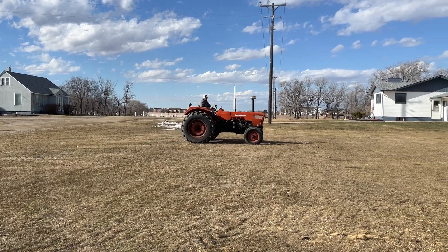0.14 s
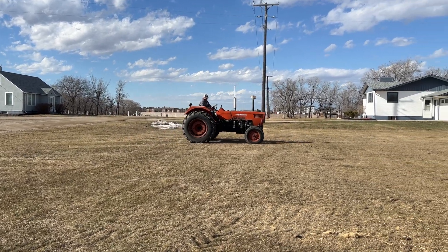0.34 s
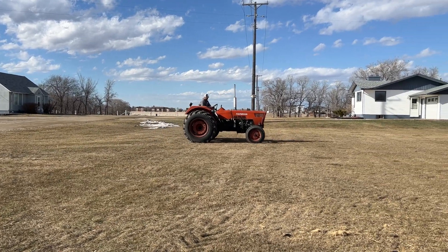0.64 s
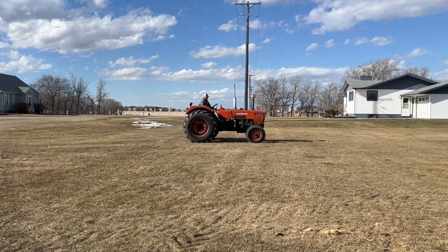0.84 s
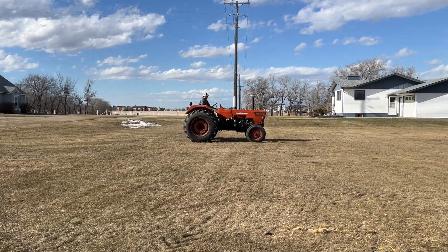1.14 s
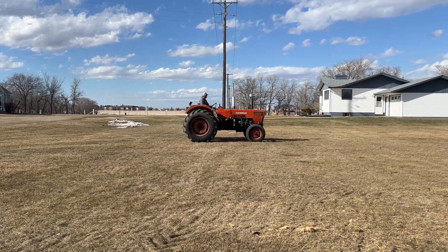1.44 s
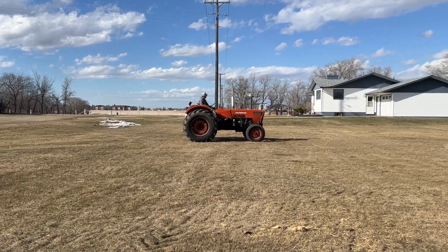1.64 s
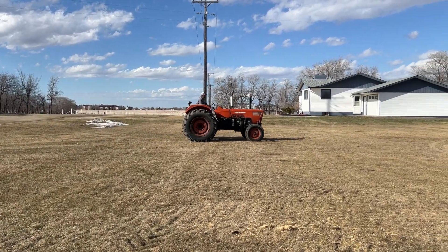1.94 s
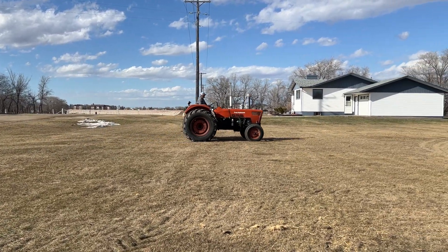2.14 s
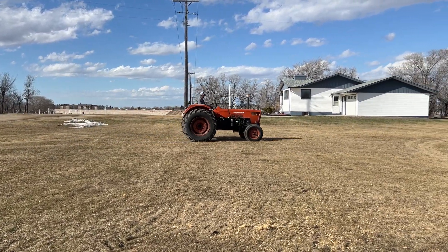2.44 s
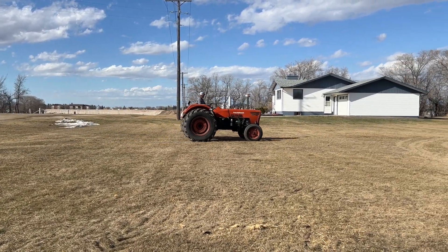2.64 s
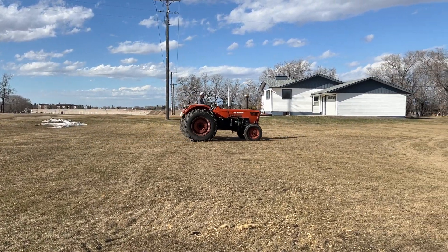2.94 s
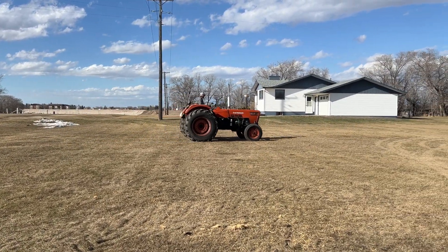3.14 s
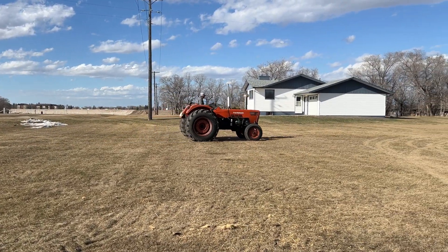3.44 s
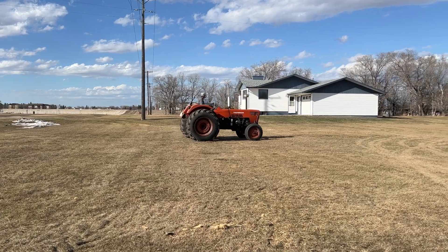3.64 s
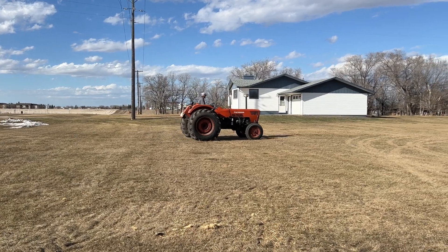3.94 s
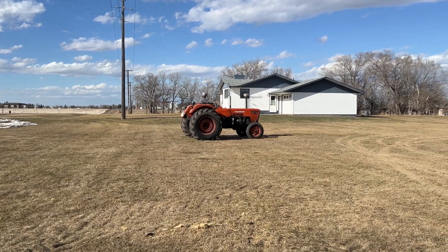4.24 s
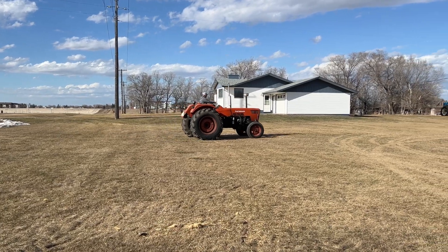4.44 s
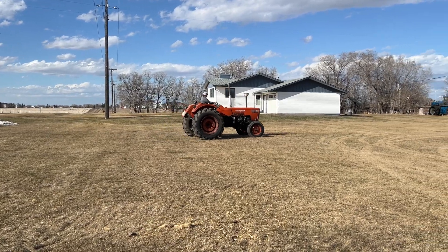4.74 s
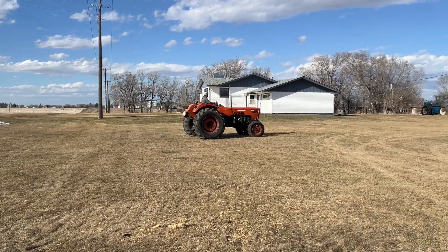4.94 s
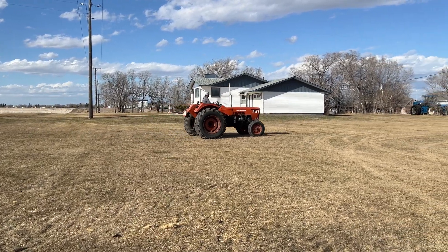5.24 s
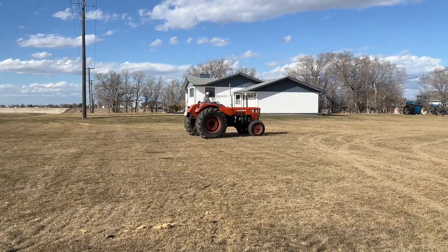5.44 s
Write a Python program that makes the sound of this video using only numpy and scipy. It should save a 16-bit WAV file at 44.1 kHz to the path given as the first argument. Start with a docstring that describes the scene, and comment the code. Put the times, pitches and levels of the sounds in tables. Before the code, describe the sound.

A diesel tractor engine drones and clatters steadily outdoors, with a rush of fan air, injector ticks and one insistent metallic knock.

```python
"""A four-cylinder air-cooled diesel tractor crawls across a farm yard at a governed speed.
From the start its exhaust drones as a sum of harmonics, beating slowly against a second, idling engine.
Shaped noise gives the fan's rush and, cylinder by cylinder, injector ticks, block knocks, rattle and puffs;
damped sines give the metal impacts and a loose piston's knock. Rush and puffs are strongest at 1.5 s,
the knock peaks at 2.4 s, and from 2.3 s on the injector ticks are progressively screened."""
import sys
import numpy as np
from scipy import signal
from scipy.fft import rfft, irfft
from scipy.io import wavfile

SR = 44100
rng = np.random.default_rng(int(sys.argv[2]) if len(sys.argv) > 2 else 0)


def dump_mix(stems):
    """Bounce the given channels to the path in sys.argv[1] as a 16-bit WAV at rate SR."""
    frames = np.atleast_2d(stems).T  # one column per channel
    limited = np.clip(frames, -1, 1)  # hard clip at full scale
    pcm = np.round(limited * 32767).astype(np.int16)
    wavfile.write(sys.argv[1], SR, pcm)


N = 246519
TIME = np.arange(N) / SR
FREQS = np.fft.rfftfreq(N, 1 / SR) + 1e-6  # the offset avoids division by zero

# One engine cycle is two crank turns; a place in the cycle runs from 0 to 1.
# Crank speed as the governor hunts about its setting: t/s, speed/(rev/min)
CRANK_SPEED = [(0.0, 1475.7), (0.62, 1493.3), (1.12, 1464.1), (1.78, 1492.4), (1.92, 1476.6),
               (2.64, 1474.6), (2.78, 1484.4), (3.77, 1476.1), (4.07, 1487), (4.71, 1468.3), (5.59, 1479.4)]
# Exhaust harmonics: order [multiples of the cycle rate], peak level/dB at start, middle and end
EXHAUST_ORDERS = [(4, -29.5, -31.3, -31.5), (6, -45, -48, -47), (7, -47, -50, -60), (8, -34, -34, -32.5),
                  (9, -38, -46, -49), (10, -40, -39, -43), (11, -38, -40.5, -43.5), (12, -32, -33, -39),
                  (14, -42, -48, -58), (15, -40, -39, -40), (16, -34.5, -35.5, -33.5), (17, -36, -34, -34),
                  (18, -36, -38, -40), (19, -31, -30.3, -31.5), (20, -48, -46, -44), (21, -29, -25.8, -28),
                  (22, -44, -49, -53), (23, -55, -51, -48), (25, -50, -54, -62), (26, -52, -49, -56),
                  (28, -58, -54, -47), (30, -57, -50, -60), (32, -48, -50, -49), (50, -54, -54, -55),
                  (60, -47, -49, -50)]
# Harmonics of the idling engine: order [multiples of its cycle rate], peak level/dB at start, middle, end
IDLER_ORDERS = [(6, -33.3, -33.8, -33.8), (7, -44, -45, -45), (9, -36, -36, -36), (12, -44, -44, -44),
                (15, -51, -53, -51), (17, -44, -47, -45), (18, -35, -35.5, -34), (21, -43, -43, -45),
                (22, -43, -45, -48), (24, -49, -49, -55), (56, -53, -53, -54)]
IDLER_RPM = 900
# Silencers: delay [cycles], dispersion [turns per squared order above the firing order]
TRACTOR_SILENCER = (.334, .1105)
IDLER_SILENCER = (.728, .0455)
# Pipe boom, slightly sharp so that it drifts against the idler: centre [order], half-width [orders], shift f/Hz
PIPE_BOOM = (11.5, 1.5, .085)

# Cylinders in firing order: place [cycles], relative level/dB of injector, combustion, valve rattle
CYLINDER_BLOWS = [(.178, 1, 0, -1.5), (.43, -3.5, -.5, 0), (.682, 0, .5, .5), (.935, -4, -1.5, -3)]
# Noise spectra of air rush, exhaust puffs, block, injectors, valve gear: f/Hz, relative level/dB per Hz
FAN_SPECTRUM = [(20, -32), (45, -30), (90, -9.5), (150, 6), (270, 1.5), (350, -5.5), (550, -7),
                (1000, -2.5), (1400, -5), (2200, -9.5), (3800, -20.5), (6500, -32.5), (8500, -29.5),
                (10500, -54), (15500, -46)]
GAS_SPECTRUM = [(150, -25), (290, 0), (420, -1), (530, -5), (800, -25), (2000, -60)]
BLOCK_SPECTRUM = [(200, -7), (300, 2), (450, -7), (590, -8), (740, 5.5), (930, -6), (1170, -5.5), (1370, 3),
                  (1650, -10.5), (2100, -10), (2900, -22), (4200, -25), (6500, -19.5), (12000, -80)]
INJECTOR_SPECTRUM = [(1500, -22), (3200, -9), (4700, 0.5), (5200, 7.5), (6000, 10.5), (6700, -21),
                     (7300, 5.5), (7800, 12.5), (8400, 8.5), (9300, 2.5), (10300, -14), (15500, 0.5)]
VALVE_SPECTRUM = [(1000, -25), (1900, 6), (2300, 2), (2510, 7), (2750, -0.5), (3250, -4.5), (3700, -6),
                  (4200, -5), (4750, -7), (6500, -25), (12000, -58)]

# Bonnet panels and fins that sing along: f/Hz, bandwidth f/Hz, level/dB at five evenly spaced moments
PANEL_MODES = [(740, 12, -51, -51, -55, -56, -53), (795, 12, -51, -52, -58, -57, -54),
               (1043, 18, -45.5, -45, -50, -50, -52), (1375, 80, -50, -43, -50, -43.5, -43),
               (2500, 90, -49.5, -53, -51, -55, -58), (3200, 300, -55, -58, -60, -55, -57),
               (4500, 400, -56, -60, -60, -64, -66)]
# Impacts of pistons, valves, gears: place [cycles], ring f/Hz, decay t/s, level/dB at four even moments
METAL_IMPACTS = [(0.03, 910.0, 0.0007, -47.0, -57.0, -57.0, -57.0),
                 (0.195, 1100.0, 0.0007, -49.0, -49.0, -51.0, -53.0),
                 (0.205, 3300.0, 0.003, -60.0, -63.0, -63.0, -61.0),
                 (0.21, 2050.0, 0.0012, -52.0, -56.0, -55.0, -54.0),
                 (0.235, 1210.0, 0.0007, -48.0, -50.0, -49.0, -47.0),
                 (0.245, 1050.0, 0.002, -47.0, -51.0, -57.0, -57.0),
                 (0.26, 1690.0, 0.0012, -60.0, -54.0, -58.0, -50.0),
                 (0.445, 3300.0, 0.003, -62.0, -60.0, -58.0, -68.0),
                 (0.455, 830.0, 0.0007, -59.0, -59.0, -49.0, -59.0),
                 (0.455, 1270.0, 0.0007, -49.0, -48.0, -58.0, -58.0),
                 (0.46, 2730.0, 0.0004, -54.0, -64.0, -61.0, -64.0),
                 (0.47, 1460.0, 0.002, -55.0, -56.0, -47.0, -56.0),
                 (0.475, 910.0, 0.002, -48.0, -49.0, -57.0, -57.0),
                 (0.48, 2600.0, 0.003, -55.0, -65.0, -56.0, -65.0),
                 (0.485, 1950.0, 0.003, -51.0, -60.0, -53.0, -57.0),
                 (0.49, 1270.0, 0.003, -46.0, -46.0, -55.0, -45.0),
                 (0.535, 680.0, 0.002, -50.0, -60.0, -51.0, -59.0),
                 (0.69, 3150.0, 0.003, -55.0, -60.0, -57.0, -61.0),
                 (0.705, 1330.0, 0.0012, -47.0, -51.0, -50.0, -50.0),
                 (0.72, 790.0, 0.0007, -58.0, -48.0, -58.0, -58.0),
                 (0.72, 1540.0, 0.0007, -51.0, -52.0, -56.0, -49.0),
                 (0.72, 2150.0, 0.003, -52.0, -61.0, -52.0, -60.0),
                 (0.73, 870.0, 0.0012, -44.0, -52.0, -51.0, -50.0),
                 (0.76, 1460.0, 0.0007, -48.0, -50.0, -48.0, -57.0),
                 (0.785, 830.0, 0.0007, -57.0, -47.0, -57.0, -57.0),
                 (0.79, 1770.0, 0.0007, -54.0, -59.0, -59.0, -50.0),
                 (0.83, 1000.0, 0.0012, -50.0, -52.0, -59.0, -59.0),
                 (0.86, 720.0, 0.002, -57.0, -53.0, -52.0, -50.0),
                 (0.955, 1460.0, 0.0004, -46.0, -50.0, -47.0, -52.0),
                 (0.96, 2860.0, 0.0007, -57.0, -67.0, -62.0, -67.0),
                 (0.98, 1000.0, 0.0007, -52.0, -59.0, -49.0, -59.0),
                 (0.985, 1690.0, 0.0007, -53.0, -58.0, -61.0, -52.0)]
# Standard deviations between cycles: strength/dB, ring pitch [fraction], direct phase [rad]
IMPACT_SCATTER_DB, IMPACT_DETUNE, IMPACT_SMEAR = 1., .018, .35
# Knock of the loose piston, loudest while its cylinder faces the listener: t/s, level/dB
KNOCK_LEVEL = [(0, -47), (.8, -47), (1.6, -44), (2.4, -41.8), (3.2, -43), (4, -44.8), (4.8, -48),
               (5.59, -48)]
KNOCK_PLACE, KNOCK_START_HZ, KNOCK_END_HZ = .1965, 2700, 1390
KNOCK_FALL_S, KNOCK_DECAY_S = .0005, .00064

# Layer levels/dB, before the changes over time
GAS_DB, FAN_DB = -44.5, -33.5
COMBUSTION_DB, VALVE_DB, INJECTOR_DB = -40, -44.5, -50.5
# The tractor swings past: the rush is SWING_DB weaker SWING_S before or after it is side-on
SIDE_ON_S, SWING_S, SWING_DB = 1.5, 2.5, 0.9
# Block and valves drift in level as the tractor turns; the injectors are screened once it has turned
BLOCK_DB_PER_S, VALVE_DB_PER_S = 0.25, -0.03
SCREENED_S, SCREEN_DB_PER_S = 2.3, 1.1

# Stereo spread of the scattered sound: f/Hz, side minus mid level/dB
SIDE_SPECTRUM = [(50, -2), (250, -14.5), (500, -10), (1000, -9.5), (2000, -8), (4000, -2.5), (8000, -14),
                 (13000, -15)]
# Channel balance: f/Hz, left minus right level/dB
CHANNEL_BALANCE = [(120, 0.5), (250, -1), (380, 1), (700, -0.5), (1290, 3.5), (2380, 0), (4400, 1.5),
                   (8120, 0.5)]
LEFT_LEAD_S = .000022
# Narrow treble dips: f/Hz, full width between 1/e points f/Hz, depth [0-1]
TREBLE_DIPS = [(2270, 160, .25), (2800, 260, .2), (5020, 190, .58), (5670, 190, .64), (6370, 220, .4)]
TOP_HZ = 15800


def undb(db):
    """Level definition: an amplitude ratio is 10 to the power of level/20."""
    return 10 ** (np.asarray(db) / 20)


def unit(x):
    """Normalisation: scale to an rms value of 1."""
    return x / np.sqrt(np.mean(x ** 2))


def curve(table):
    """Linear interpolation of a two-column timed table at every sample."""
    s, values = np.transpose(table)
    return np.interp(TIME, s, values)


def passing(db):
    """Gain interpolated in dB through levels evenly spaced from start to end."""
    return undb(np.interp(TIME, np.linspace(0, TIME[-1], len(db)), db))


def colour(x, points):
    """Linear filtering: multiply the spectrum by a gain drawn through (f/Hz, level/dB) points."""
    hz, db = np.transpose(points)
    gain = undb(np.interp(np.log(FREQS), np.log(hz), db))
    return irfft(rfft(x) * gain, N)


def resonate(x, hz, width):
    """Forced vibration: the response of a damped resonance to a driving signal."""
    response = 1 / (1 + 1j * (FREQS ** 2 - hz ** 2) / (FREQS * width))
    return irfft(rfft(x) * response, N)


def walk(rate):
    """Slow random fluctuation: interpolated normal values, rate per second, with a spread near 0.7."""
    return 0.85 * np.interp(TIME * rate, np.arange(256), rng.standard_normal(256))


def since_blow(cycle, place):
    """Periodicity: number of the latest blow and its age in seconds at the mean cycle period."""
    count, part = np.divmod(cycle - place + 1, 1)
    return count.astype(int), part * TIME[-1] / cycle[-1]


def blows(cycle, place, decay_s, rise_s, scatter_db):
    """Transient excitation: a rising and decaying blow once a cycle, of randomly varying strength."""
    count, age = since_blow(cycle, place)
    size = undb(scatter_db * rng.standard_normal(128))[count]
    return size * (1 - np.exp(-age / rise_s)) * np.exp(-age / decay_s)


def rattle(cycle, repeat, change_s, size=3600, count=12):
    """Partial coherence: noise of which a power share repeats each cycle, in a slowly shifting pattern."""
    place = (cycle % 1 * size).astype(int)
    pattern = np.zeros((2, N))  # direct and scattered sound
    for k, shape in enumerate(rng.standard_normal((count, 2, size))):
        distance = TIME / change_s - k
        near = abs(distance) < 1
        # equal-power crossfade between successive patterns
        pattern[:, near] += np.cos(np.pi / 2 * distance[near]) * shape[:, place[near]]
    return np.sqrt(repeat) * pattern + np.sqrt(1 - repeat) * rng.standard_normal((2, N))


def drone(cycle, orders, firing_order, silencer, waver_db, waver_turns, waver_rate, sharp_hz=0):
    """Fourier synthesis: wavering harmonics, with a dispersive pipe delaying the high ones and smearing pulses."""
    delay, dispersion = silencer
    boom_order, boom_width, _ = PIPE_BOOM
    out = np.zeros(N)
    for order, *db in orders:
        above = round(order) - firing_order
        lag = delay * above + dispersion * above ** 2 + waver_turns * walk(waver_rate)
        boom = np.exp(-((order - boom_order) / boom_width) ** 4)
        drift = sharp_hz * boom * (TIME - 1.2)
        turns = round(order) * cycle - lag + drift
        out += passing(db) * undb(waver_db * walk(waver_rate)) * np.sin(2 * np.pi * turns)
    return out


def exhaust(cycle):
    """Harmonic series: the silenced exhaust sounds at multiples of the engine's cycle rate."""
    return drone(cycle, EXHAUST_ORDERS, firing_order=4, silencer=TRACTOR_SILENCER,
                 waver_db=.6, waver_turns=.012, waver_rate=4, sharp_hz=PIPE_BOOM[2])


def idler():
    """Beating: a second engine at constant speed has harmonics close to those of the exhaust."""
    cycle = TIME * IDLER_RPM / 120 - .034
    return drone(cycle, IDLER_ORDERS, firing_order=6, silencer=IDLER_SILENCER,
                 waver_db=.8, waver_turns=.01, waver_rate=3)


def fan(cycle):
    """Flow noise: cooling air and exhaust gas rush on between the firings."""
    rush = unit(colour(rattle(cycle, repeat=.28, change_s=1.4), FAN_SPECTRUM))
    return rush * undb(.5 * walk(5))


def panels(cycle):
    """Resonance: the shaking engine keeps bonnet and fins ringing in a few unsteady tones."""
    shake = rattle(cycle, repeat=.4, change_s=.6)
    return sum(passing(db) * unit(resonate(shake, hz, width)) for hz, width, *db in PANEL_MODES)


def gas(cycle):
    """Pulsed flow: each exhaust stroke ends in a dull puff of noise at the mouth of the stack."""
    puffs = sum(blows(cycle, place, decay_s=.018, rise_s=.0026, scatter_db=2.)
                for place, *_ in CYLINDER_BLOWS)
    return unit(colour(puffs * rattle(cycle, repeat=.45, change_s=.8), GAS_SPECTRUM))


def combustion(cycle, delay=.023):
    """Structure-borne sound: each charge ignites just after injection (delay in cycles) and shakes the block."""
    force = sum(undb(db) * blows(cycle, place + delay, decay_s=.02, rise_s=.0008, scatter_db=1.)
                for place, _, db, _ in CYLINDER_BLOWS)
    return unit(colour(force * rattle(cycle, repeat=.68, change_s=.6), BLOCK_SPECTRUM))


def injectors(cycle):
    """Impact noise: needles and valve gear give a bright, gritty tick for each cylinder."""
    force = sum(undb(db) * blows(cycle, place, decay_s=.0095, rise_s=.0005, scatter_db=1.2)
                for place, db, _, _ in CYLINDER_BLOWS)
    return unit(colour(force * rattle(cycle, repeat=.08, change_s=.9), INJECTOR_SPECTRUM))


def valve_rattle(cycle):
    """Repeated excitation: rockers and cooling fins buzz brightly once a cycle for each cylinder."""
    force = sum(undb(db) * blows(cycle, place, decay_s=.014, rise_s=.0017, scatter_db=3.5)
                for place, _, _, db in CYLINDER_BLOWS)
    return unit(colour(force * rattle(cycle, repeat=.5, change_s=.5), VALVE_SPECTRUM))


def impacts(cycle):
    """Damped free vibration: short metallic rings in fixed order, their scattered sound in any phase."""
    out = np.zeros((2, N))
    for place, hz, decay_s, *db in METAL_IMPACTS:
        count, age = since_blow(cycle, place)
        size, detune, direct, scattered = rng.standard_normal((128, 4)).T
        envelope = unit(undb(IMPACT_SCATTER_DB * size)[count] * age * np.exp(-age / decay_s))
        phase = np.array([IMPACT_SMEAR * direct, np.pi * scattered])[:, count]
        pitch = hz * (1 + IMPACT_DETUNE * detune[count])
        ring = np.sqrt(2) * np.sin(2 * np.pi * pitch * age + phase)
        out += passing(db) * envelope * ring
    return out


def loose_piston(cycle):
    """Dispersion: a piston strikes its barrel each cycle; high rings arrive first, so the knock falls in pitch."""
    count, age = since_blow(cycle, KNOCK_PLACE)
    strength, detune = rng.standard_normal((128, 2))[count].T
    # integral of a frequency falling exponentially to its end value
    fall = (KNOCK_START_HZ - KNOCK_END_HZ) * KNOCK_FALL_S * (1 - np.exp(-age / KNOCK_FALL_S))
    turns = KNOCK_END_HZ * age + fall
    ring = np.sin(2 * np.pi * turns * (1 + IMPACT_DETUNE * detune))
    envelope = undb(strength / 4) * age ** 2 * np.exp(-age / KNOCK_DECAY_S)
    return unit(envelope * ring) * undb(curve(KNOCK_LEVEL))


def spread(pair):
    """Interaural difference: direct sound reaches the left first; scattered sound has opposite signs."""
    side = colour(pair[1], SIDE_SPECTRUM)
    direct = rfft(pair[0])
    early = np.exp(1j * np.pi * FREQS * LEFT_LEAD_S)  # half the lead on each channel
    return np.array([irfft(direct * early, N) + side, irfft(direct / early, N) - side])


def scene():
    """Superposition: one crankshaft drives every tractor sound; the other engine keeps its own time."""
    cycle = np.cumsum(curve(CRANK_SPEED)) / (120 * SR)
    swell_db = -SWING_DB * ((TIME - SIDE_ON_S) / SWING_S) ** 2
    screen_db = -SCREEN_DB_PER_S * np.maximum(TIME - SCREENED_S, 0)
    rush = undb(FAN_DB + swell_db) * fan(cycle)
    # the puffs are the most directional, so they swell and fade the most
    puffs = undb(GAS_DB + 5.3 * swell_db) * gas(cycle)
    knocks = undb(COMBUSTION_DB + BLOCK_DB_PER_S * TIME) * combustion(cycle)
    ticks = undb(INJECTOR_DB + screen_db) * injectors(cycle)
    buzz = undb(VALVE_DB + VALVE_DB_PER_S * TIME) * valve_rattle(cycle)
    wide = rush + panels(cycle) + puffs + knocks + ticks + buzz + impacts(cycle)
    return exhaust(cycle) + idler() + spread(wide) + loose_piston(cycle)


def record(dry):
    """Filtering: the channels differ in balance, the treble has narrow dips and the top is cut steeply."""
    half = np.array(CHANNEL_BALANCE) * [1, .5]  # half the difference goes to each channel
    heard = np.array([colour(dry[0], half), colour(dry[1], half * [1, -1])])
    dips = np.ones(len(FREQS))
    for hz, width, depth in TREBLE_DIPS:
        dips *= 1 - depth * np.exp(-(2 * (FREQS - hz) / width) ** 2)
    dipped = irfft(rfft(heard) * dips, N)
    top_cut = signal.ellip(8, .2, 70, TOP_HZ, fs=SR, output="sos")  # ripple and stop-band level/dB
    return signal.sosfilt(top_cut, dipped)


dry = scene()
out = record(dry)
dump_mix(out)
```